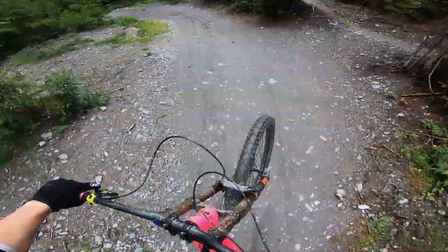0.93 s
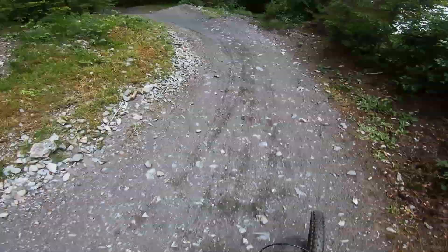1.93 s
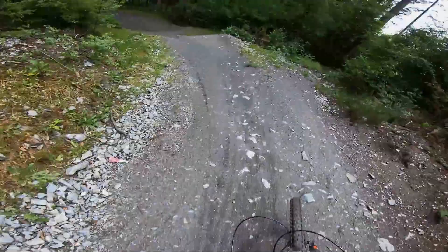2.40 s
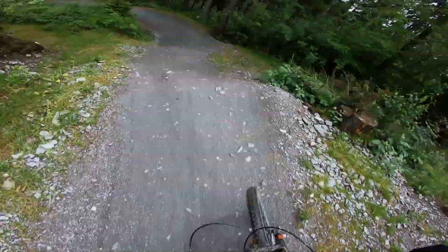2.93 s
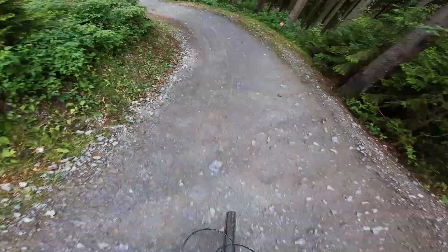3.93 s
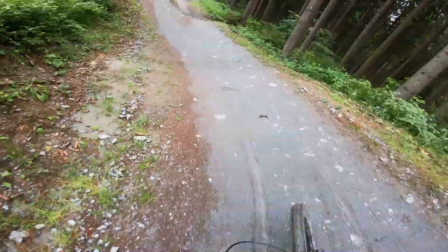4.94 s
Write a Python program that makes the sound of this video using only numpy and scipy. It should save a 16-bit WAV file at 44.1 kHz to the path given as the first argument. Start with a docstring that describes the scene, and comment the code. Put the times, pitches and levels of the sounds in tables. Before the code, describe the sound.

A mountain bike rolls down a gravel forest trail, heard from a muffled camera microphone on board. Wind thumps and flutters hardest in the first second and a half, then eases as the crunch of loose stones comes forward. Scattered dry knocks on the frame follow, then a dense rattle around four seconds with bright grit ticks. Tyre roar is fuller near the end, with a few lone clacks.

```python
"""Headwind thumps and flutters while tyres roar and crunch on wet gravel, with clatter and ticking grit.
A mountain bike rolls down a trail, heard by a camera in a housing, which likely swaps microphones in the wind.
Wind is shaped noise in three ranges with short slaps on top. Tyres are patchy noise, grains and pings.
Stones and chain on the frame are noise bursts through resonances. The wind reduction leaves a narrow
hiss at a gliding pitch. A steady noise of the microphone is added and the peaks are rounded off."""
import sys
import numpy as np
from scipy import signal
from scipy.fft import rfft, irfft, next_fast_len
from scipy.io import wavfile
from scipy.ndimage import uniform_filter1d, map_coordinates

SR = 44100
rng = np.random.default_rng(int(sys.argv[2]) if len(sys.argv) > 2 else 0)


def natural_amplitude(level_db):
    """Convert a level in decibels to a linear amplitude factor, elementwise."""
    exponent = np.asarray(level_db, float) / 20
    return 10 ** exponent


def put_to_file(sound):
    """Save the sound as 16-bit audio at rate SR, in the file named by the first command-line argument."""
    columns = np.atleast_2d(sound).T  # one column per channel
    safe = np.clip(columns, -1, 1)
    whole_steps = np.round(safe * 32767)
    wavfile.write(sys.argv[1], SR, whole_steps.astype(np.int16))


N = 252252

# Headwind. Each row: time in seconds, strength in dB, eddy size in dB (larger: more rumble, less flutter).
GUSTS = [(0, -22, -9), (.3, -29, 1), (.62, -23, -3.5), (.66, -18.5, 3), (.94, -17, -11), (1.16, -20, -6.5),
         (1.53, -31.5, 1), (1.9, -27.5, 1), (2.3, -26, 0.5), (2.9, -24.5, 1), (3.18, -21, -5.5),
         (3.36, -20, -2), (3.55, -30.5, 7), (3.97, -21, -2.5), (4.35, -25, -2), (4.5, -24, -5),
         (5.13, -24.5, 1.5), (5.35, -24, -5), (5.5, -28, 4), (5.72, -36, 4)]
# Brief lulls in the wind. Each row: centre in seconds, change in dB, half length in seconds.
WIND_LULLS = [(1.05, -13, 0.038), (3.4, -17, 0.015), (3.625, -6, 0.031)]
# Very large eddies heaving the port, in the rumble only. Each row: centre in seconds, lift in dB,
# half length in seconds.
EDDY_HEAVES = [(.04, 11.5, 0.15), (1.05, 23, 0.054), (3.46, 8.5, 0.013), (5.42, 10, 0.081)]
# Spectra of the three wind layers. Each row: frequency in Hz, relative density in dB per Hz.
RUMBLE_SPECTRUM = [(12, -5.5), (25, -7.5), (45, -4), (75, -4.5), (110, -21.5), (400, -120)]
BUFFET_SPECTRUM = [(40, -41), (75, -4), (120, -0.5), (200, -8), (300, -15.5), (1500, -120)]
FLUTTER_SPECTRUM = [(120, -38), (240, 3.5), (450, -2), (800, -9), (1500, -25), (6000, -120)]
# Single eddies slapping the port. Each row: time in seconds (the swell starts 11 ms earlier),
# peak of the body in dB, peak of the bright edge over the body in dB.
EDDY_SLAPS = [(0.409, -14, -15), (0.64, -16.5, -16), (0.695, -12.5, -13), (0.796, -10.5, -7),
              (0.89, -12.5, -14.5), (0.939, -19, -12), (0.998, -16, -18.5), (1.134, -14, -17.5),
              (1.264, -12.5, -11), (1.312, -15.5, -11), (1.356, -31, -10), (1.641, -26, -2),
              (2.87, -16, -15), (3.099, -13.5, -11.5), (3.147, -17, -15), (3.188, -10.5, -12.5),
              (3.651, -20.5, -35), (3.731, -20.5, -29), (4.106, -15.5, -22), (4.699, -22, -4.5),
              (5.159, -16, -26)]
# Spectra of a slap's body and edge. Each row: frequency in Hz, relative density in dB per Hz.
SLAP_BODY_SPECTRUM = [(100, -1.5), (220, 7), (500, -1.5), (800, -11), (3000, -120)]
SLAP_EDGE_SPECTRUM = [(500, -39.5), (800, -6), (1300, -12.5), (1900, -23), (6000, -120)]
# How hard the tyres are driven into the trail. Each row: time in seconds, level of the hum in dB.
TYRE_PACE = [(0, -50.5), (.57, -36.5), (.7, -49), (.76, -44.5), (1.01, -59), (1.38, -57), (1.45, -42.5),
             (1.62, -47), (1.645, -36.5), (1.9, -41), (2.4, -37.5), (2.84, -38), (2.94, -42.5), (3.13, -38),
             (3.28, -48.5), (3.5, -53), (3.87, -46), (3.93, -41.5), (4.03, -36.5), (4.07, -44),
             (4.68, -34.5), (5.0, -32), (5.05, -37), (5.72, -39.5)]
# Stretches of tyre sound, stepping as the camera likely swaps microphones. Each row: start in seconds,
# crunch of loose stones at the start in dB, at the end in dB,
# tread buzz over the crunch in dB (the pace shifts it further).
TYRE_STRETCHES = [(0, -43.5, -43.5, 1.5), (.6, -47.5, -45, 3.5), (.73, -50.5, -57.5, 5),
                  (1.42, -45.5, -38.5, -17), (1.53, -43, -41.5, -10), (2.96, -46.5, -44, -4),
                  (3.3, -51, -51.5, 0), (3.64, -50, -48, 2.5), (3.91, -39.5, -35, -5),
                  (4.05, -42, -35.5, -4.5), (4.7, -35.5, -39.5, -7.5), (5.03, -43.5, -46, -10)]
# What the housing lets through. Each row: frequency in Hz, gain in dB.
HOUSING_GAIN = [(700, -9), (950, -3), (1180, 2), (1550, -10), (2080, 0), (2650, -6.5), (3200, -4),
                (3800, -9.5), (5000, -14.5), (5800, -31), (8000, -27.5), (9200, -33.5), (9700, -46),
                (11000, -46.5), (12400, -46.5), (13200, -61), (16000, -101)]
# Blows on the frame. Each row: time in seconds, level in dB, favoured pitch in Hz,
# low knock over the blow in dB (trimmed by 1.5 dB in the mix).
FRAME_BLOWS = [(0.4824, -20.5, 1950, 2.5), (0.5575, -16, 1890, -1.5), (0.844, -25, 2300, -20),
               (0.9, -23, 2570, -3), (1.27, -35, 2880, 14), (1.414, -24, 2930, -7), (1.447, -25, 3660, -3),
               (1.487, -19.5, 4140, -10), (1.6195, -26.5, 2110, -35), (2.143, -26.5, 2200, 8),
               (2.1727, -23, 3370, 5.5), (2.3204, -16, 2240, 1), (2.389, -20, 3670, -6),
               (2.4708, -20.5, 3400, 2), (2.7125, -17.5, 3960, -14), (2.8228, -25.5, 2200, 3.5),
               (3.082, -22.5, 2270, 1), (3.255, -27, 3080, 2.5), (3.363, -53.5, 1250, 24),
               (3.469, -50, 1200, 18), (3.524, -38.5, 1240, 10.5), (3.559, -33, 4100, -30),
               (3.865, -21.5, 2880, -3), (3.922, -9.5, 2370, -9.5), (3.937, -14, 3170, -7),
               (3.9867, -13, 3060, -30), (4.0272, -18, 2350, -1.5), (4.063, -22, 2350, -31),
               (4.11, -24, 2900, -19), (4.147, -15.5, 3020, -5), (4.21, -22, 2310, -19),
               (4.2451, -18.5, 2400, -5), (4.283, -24, 2400, 2), (4.344, -18, 2300, -4),
               (4.5136, -9.5, 3620, -6.5), (4.6715, -21, 2030, -1), (4.834, -18, 2180, -4),
               (4.983, -18, 2330, -12), (5.457, -16.5, 2320, -8)]
# Grit striking the housing. Each row: time in seconds, level in dB before filter and housing.
GRIT_STRIKES = [(2.081, -10), (2.123, -7), (2.182, -0.5), (2.3203, -1.5), (2.9257, -11), (3.882, -10),
                (3.92, -3), (3.951, -4), (3.9896, 3.5), (4.004, 3), (4.029, -2), (4.089, -4), (4.179, -2.5),
                (4.317, -3.5), (4.5073, -3), (4.869, -2.5), (4.989, -6), (5.456, -3.5), (5.489, -2.5)]
# Narrow hiss from the wind reduction. Each row: start in seconds, end in seconds, first pitch in Hz,
# last pitch in Hz, level in dB.
GLIDING_HISS = [(.6, .72, 3300, 3200, -43), (.7, .78, 3000, 2880, -43), (.655, .745, 2200, 1900, -40),
                (.735, .8, 2100, 1600, -39), (.65, .77, 1250, 900, -35), (.84, 1.23, 2780, 2720, -50),
                (1.24, 1.34, 500, 750, -38), (1.29, 1.355, 1050, 1550, -41), (1.48, 1.6, 3300, 3150, -44),
                (2.38, 2.77, 3350, 3200, -45), (3.05, 3.28, 3300, 3300, -46), (4.62, 4.84, 800, 1450, -33),
                (4.86, 5.5, 3250, 3200, -46)]
# The microphone's own noise. Each row: frequency in Hz, relative density in dB per Hz.
SELF_NOISE_SPECTRUM = [(4000, -38), (6000, 2), (9000, -3.5), (10500, 1), (12500, -10.5), (13500, -23),
                       (16000, -65)]

# where one tyre layer hands over to the next (Hz)
BUZZ_FROM_HZ, CRUNCH_FROM_HZ, SPRAY_FROM_HZ = 1668, 2660, 6300


def unit(x):
    """Bring a signal to rms 1."""
    return x / np.sqrt(np.mean(x ** 2) + 1e-20)


def along(points, hz):
    """Read (Hz, value) points on a log frequency axis."""
    f, v = np.transpose(points)
    return np.interp(np.log(hz + 1), np.log(f + 1), v)


def curves(rows):
    """Draw straight lines between rows: one value per sample for each column after the time."""
    s, *columns = np.transpose(rows)
    return [np.interp(np.arange(N) / SR, s, column) for column in columns]


def bumps(rows):
    """Sum bell-shaped level changes in dB, each down to 1/e at its half length (at least 5 ms)."""
    t = np.arange(N) / SR
    return sum(db * np.exp(-((t - s) / max(half_s, 0.005)) ** 2) for s, db, half_s in rows)


def wobble(rate):
    """A smooth random curve through `rate` random knots a second."""
    knots = rng.standard_normal(int(N * rate / SR) + 4)
    return map_coordinates(knots, [np.arange(N) * rate / SR])


def filtered(x, response):
    """Multiply the spectrum of x by a response of frequency."""
    m = next_fast_len(N + 8192)
    return irfft(rfft(x, m) * response(np.fft.rfftfreq(m, 1 / SR)), m)[:N]


def shaped_noise(spectrum, envelope=1):
    """White noise under an optional envelope, then coloured by a spectrum in dB."""
    return filtered(envelope * rng.standard_normal(N), lambda hz: natural_amplitude(along(spectrum, hz)))


def housing(hz):
    """The housing passes some pitches and muffles others: its gain at each frequency."""
    return natural_amplitude(along(HOUSING_GAIN, hz))


def burst(decay_s, attack_s):
    """A noise burst that rises fast and falls 60 dB in each decay_s."""
    t = np.arange(SR // 10) / SR
    return natural_amplitude(-60 * t / decay_s) * (1 - np.exp(-t / attack_s)) * rng.standard_normal(len(t))


def wind():
    """Eddies pass the port: large ones rumble, small ones flutter in sharp lumps."""
    strength_db, size_db = curves(GUSTS)
    pace_db, = curves(TYRE_PACE)
    buffet_db = strength_db + bumps(WIND_LULLS)
    rumble_db = buffet_db + size_db + bumps(EDDY_HEAVES)
    # flutter leans on wind strength, eddy size and the bike's pace
    flutter_db = -35 + 0.34 * (buffet_db - buffet_db.mean())
    flutter_db += -0.78 * size_db + 0.65 * (pace_db - pace_db.mean())

    eddy = wobble(22.077)
    rumble = unit(shaped_noise(RUMBLE_SPECTRUM))
    buffet = unit(shaped_noise(BUFFET_SPECTRUM, natural_amplitude(2.1 * eddy)))
    lumps = natural_amplitude(1.34 * eddy + 0.68 * wobble(60))
    flutter = unit(shaped_noise(FLUTTER_SPECTRUM, lumps))
    return natural_amplitude(rumble_db) * rumble + natural_amplitude(buffet_db) * buffet + natural_amplitude(flutter_db) * flutter


def slaps():
    """A strong eddy is a short swell of low pressure noise with a brighter edge that snaps at its crest."""
    swell_s, edge_late_s, edge_rise_s, edge_fall_s = 0.016, 0.015, 0.002, 0.016
    out, t = np.zeros(N + SR), np.arange(SR // 6) / SR
    body = shaped_noise(SLAP_BODY_SPECTRUM)
    bright = shaped_noise(SLAP_EDGE_SPECTRUM)

    u = t / swell_s
    swell = u ** 1.61 * np.exp(1 - u ** 1.52)
    after_crest = t - edge_late_s
    rise = np.exp(-(after_crest / edge_rise_s) ** 2)
    fall = np.exp(-after_crest / edge_fall_s)
    snap = 0.42 * swell + np.where(after_crest > 0, fall, rise)

    for s, db, edge_db in EDDY_SLAPS:
        start = min(round((s - 0.011) * SR), N - len(t))
        span = slice(start, start + len(t))
        low = swell * body[span]
        edge = snap * bright[span]
        slap = low / np.abs(low).max() + natural_amplitude(edge_db) * edge / np.abs(edge).max()
        out[span] += natural_amplitude(db) * slap
    return out[:N]


def tyres():
    """Rolling noise and shifting stones, coloured by the housing, in four ranges of pitch."""
    crunch_db, tread_db = stretch_levels()
    hum_db, = curves(TYRE_PACE)
    buzz_db = crunch_db + tread_db + 0.23 * (hum_db - hum_db.mean())
    spray_db = -60.5 + crunch_db - crunch_db.mean()

    stones = grains(spread_db=21, life_s=0.004, count=2200)
    pebbles = grains(spread_db=22.5, life_s=0.008, count=800)
    grit = grains(spread_db=27, life_s=0.0032, count=1200)
    roll = patchy(depth_db=-0.5) + 0.25 * pings(life_s=0.0009, spread_db=5, count=4000)

    hum = tyre_band(roll + 0.32 * stones + pebbles, 563, BUZZ_FROM_HZ)
    buzz = tyre_band(roll + 0.85 * stones + 0.8 * pebbles, BUZZ_FROM_HZ, CRUNCH_FROM_HZ)
    crunch = tyre_band(roll + 0.6 * stones, CRUNCH_FROM_HZ, SPRAY_FROM_HZ)
    spray = tyre_band(roll + 0.5 * stones + 0.9 * grit, SPRAY_FROM_HZ, SR)
    return natural_amplitude(hum_db) * hum + natural_amplitude(buzz_db) * buzz + natural_amplitude(crunch_db) * crunch + natural_amplitude(spray_db) * spray


def stretch_levels():
    """Levels of crunch and tread buzz, stepping within 32 ms as the camera likely swaps microphones."""
    crossing_s = 0.032
    ends = [row[0] - crossing_s for row in TYRE_STRETCHES[1:]] + [N / SR]
    points = []
    for (start, first_db, last_db, tread_db), end in zip(TYRE_STRETCHES, ends):
        points += [(start, first_db, tread_db), (end, last_db, tread_db)]
    return curves(points)


def tyre_band(x, low_hz, high_hz):
    """One steep-sided range of tyre noise as the housing passes it, at rms 1."""
    def above(hz, edge_hz):
        return 1 / (1 + (edge_hz / (hz + 1)) ** 16)

    def response(hz):
        return housing(hz) * np.sqrt(above(hz, low_hz) * (1 - above(hz, high_hz)))
    return unit(filtered(x, response))


def patchy(depth_db):
    """Uneven rolling: white noise with patches of random gain in time and pitch."""
    z = signal.stft(rng.standard_normal(N), nperseg=512)[2]
    field = uniform_filter1d(rng.standard_normal(z.shape), size=5, axis=0)
    field = uniform_filter1d(field, size=6, axis=1)
    return unit(signal.istft(z * natural_amplitude(depth_db * unit(field)), nperseg=512)[1][:N])


def grains(spread_db, life_s, count):
    """Shifting stones: noise bursts at random moments, uneven in size, dying to 1/e in life_s."""
    when, size = rng.random((count, 2)).T
    hits = np.bincount((when * N).astype(int), natural_amplitude(spread_db * size ** 2), N)
    envelope = signal.lfilter([1], [1, -np.exp(-1 / (life_s * SR))], hits)
    return unit(envelope * rng.standard_normal(N))


def pings(life_s, spread_db, count):
    """Single stones click against each other: short damped tones of random pitch."""
    when, pitch, size = rng.random((count, 3)).T
    t = np.arange(SR // 60) / SR
    hz = 800 * 7.0 ** pitch[:, None]
    loudness = natural_amplitude(spread_db * size[:, None] ** 2)
    tones = loudness * np.sin(2 * np.pi * hz * t) * t * np.exp(-t / life_s)
    index = (when * N).astype(int)[:, None] + np.arange(len(t))
    return unit(np.bincount(index.ravel(), tones.ravel(), N + len(t))[:N])


def clatter():
    """Each blow on the frame is a dry broad crack, one favoured pitch and a lower knock."""
    out = np.zeros(N + SR)
    lead = SR // 100  # room ahead of the blow for the crack's filter
    # the housing passes the crack as it passes the tyre noise, without its bass
    hz_grid = np.fft.rfftfreq(SR // 10, 1 / SR)
    colour = housing(hz_grid) * (hz_grid > BUZZ_FROM_HZ)
    for s, db, hz, knock_db in FRAME_BLOWS:
        blow = np.roll(burst(decay_s=0.024, attack_s=0.00005), lead)
        blow[lead] = 7.0  # the first contact is one sharp push
        crack = irfft(rfft(blow) * colour, len(blow))
        sound = natural_amplitude(-1) * crack / np.abs(crack).max()
        sound += natural_amplitude(-6.5) * ringing(blow, hz, width_hz=500)
        sound += natural_amplitude(knock_db - 1.5) * ringing(blow, hz=1007, width_hz=560)
        out[round(s * SR) - lead:][:len(blow)] += natural_amplitude(db) * sound
    return out[:N]


def ringing(x, hz, width_hz):
    """A struck part rings: x twice through one resonance, brought to peak 1."""
    b, a = signal.iirpeak(hz, hz / width_hz, SR)
    y = signal.lfilter(b, a, signal.lfilter(b, a, x))
    return y / np.abs(y).max()


def ticks():
    """Tiny grit strikes: noise bursts through a wide bell in the treble, then the housing."""
    centre_hz, half_width_hz = 8770, 2170
    out = np.zeros(N + SR)
    for s, db in GRIT_STRIKES:
        tick = burst(decay_s=0.044, attack_s=0.0003)
        out[round(s * SR):][:len(tick)] += natural_amplitude(db) * tick
    return filtered(out[:N], lambda hz: housing(hz) / (1 + ((hz - centre_hz) / half_width_hz) ** 2))


def hiss():
    """Narrow hiss from the wind reduction: a core with a wide skirt, carried up to a gliding pitch."""
    fade_s, core_hz, skirt_hz = 0.018, 80, 340

    def response(hz):
        return 1 / (1 + (hz / core_hz) ** 2) + 0.5 / (1 + (hz / skirt_hz) ** 4)
    t, out = np.arange(N) / SR, np.zeros(N)
    a = filtered(rng.standard_normal(N), response)
    b = filtered(rng.standard_normal(N), response)
    for start, end, first_hz, last_hz, db in GLIDING_HISS:
        centre_hz = np.interp(t, [start, end], [first_hz, last_hz])
        phase = 2 * np.pi * np.cumsum(centre_hz) / SR
        rough = natural_amplitude(2.2 * wobble(160))
        fade = np.clip(np.minimum(t - start, end - t) / fade_s, 0, 1)
        out += natural_amplitude(db) * fade * unit(rough * (a * np.cos(phase) + b * np.sin(phase)))
    return out


def self_noise():
    """The microphone's own steady treble noise, at -77 dB rms."""
    return natural_amplitude(-77) * unit(shaped_noise(SELF_NOISE_SPECTRUM))


def scene():
    """Wind, tyres, clatter, grit and gliding hiss in one channel."""
    return (wind() + slaps() + tyres() + clatter() + ticks() + hiss())[None]


def top_cut(x):
    """Nothing passes above the cut-off."""
    return signal.sosfilt(signal.butter(12, 15200, fs=SR, output="sos"), x)


def record(dry):
    """The microphone's own noise is added and the strongest peaks are rounded off."""
    ceiling = 0.55  # of full scale
    heard = dry + self_noise()
    soft = heard / (1 + np.abs(heard / ceiling) ** 4) ** (1 / 4)
    return top_cut(soft)


dry = scene()
out = record(dry)
put_to_file(out)
```